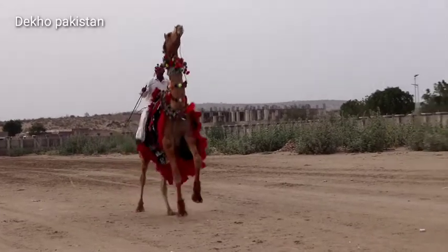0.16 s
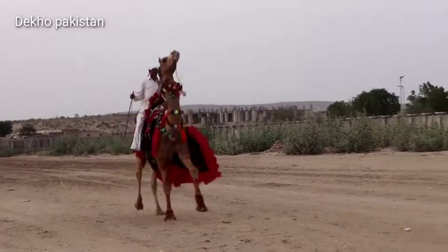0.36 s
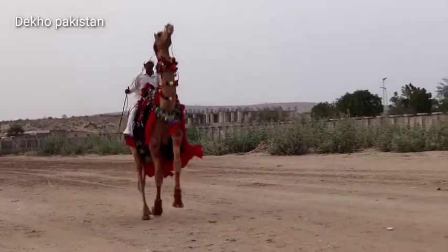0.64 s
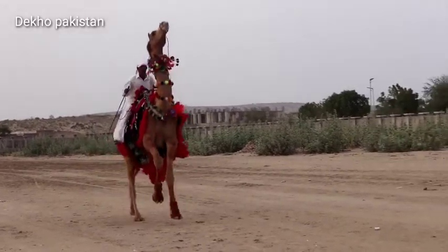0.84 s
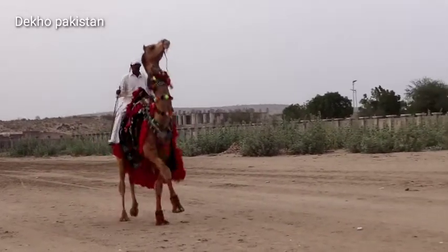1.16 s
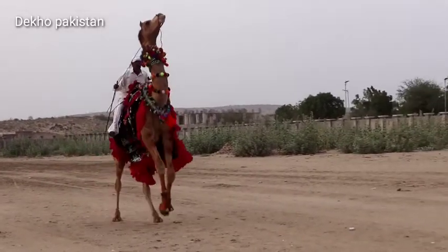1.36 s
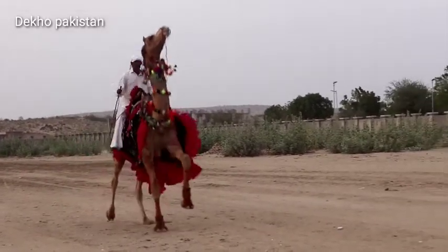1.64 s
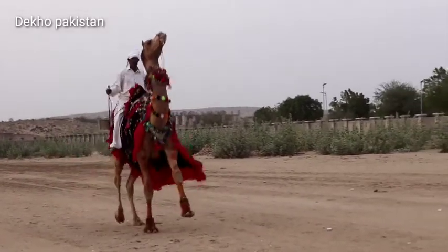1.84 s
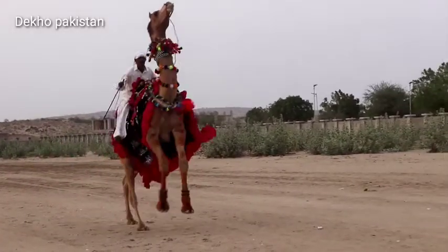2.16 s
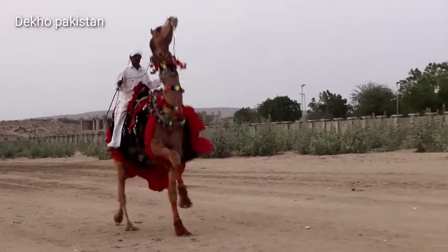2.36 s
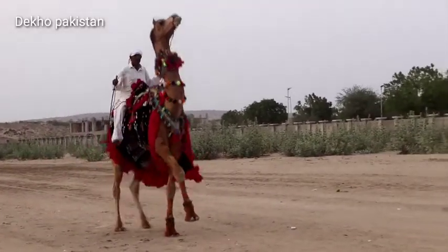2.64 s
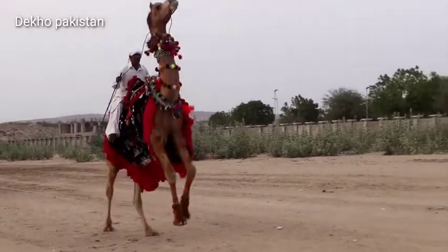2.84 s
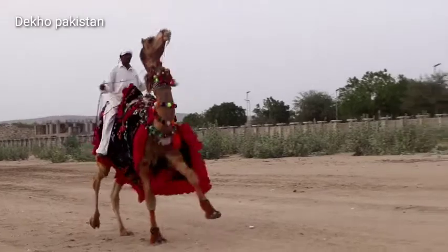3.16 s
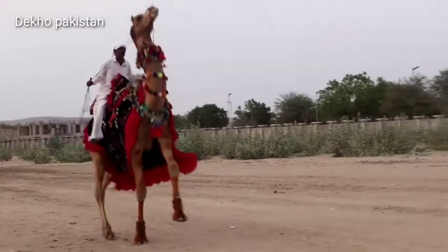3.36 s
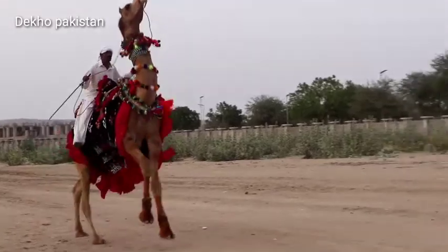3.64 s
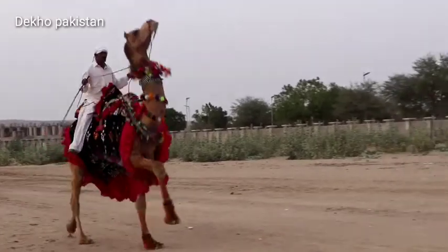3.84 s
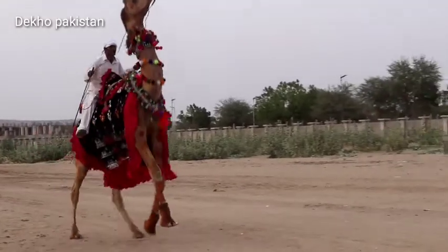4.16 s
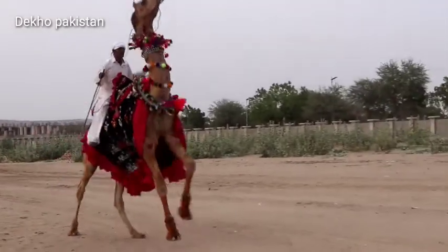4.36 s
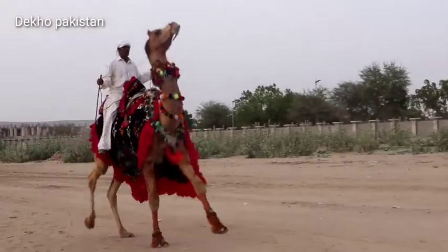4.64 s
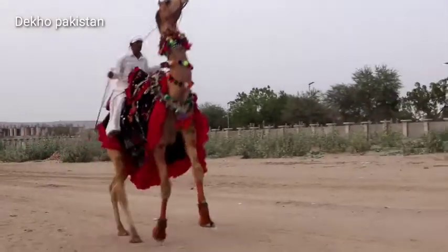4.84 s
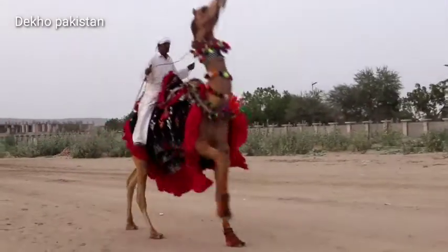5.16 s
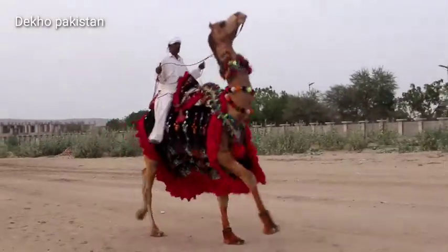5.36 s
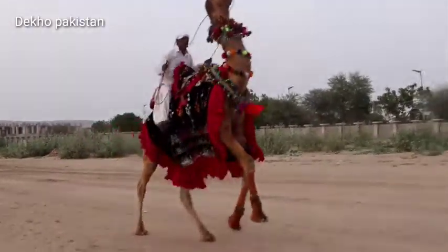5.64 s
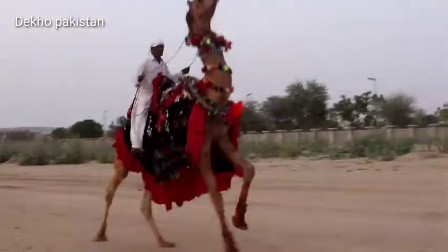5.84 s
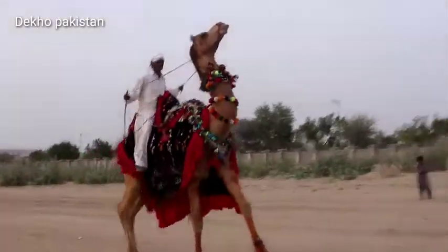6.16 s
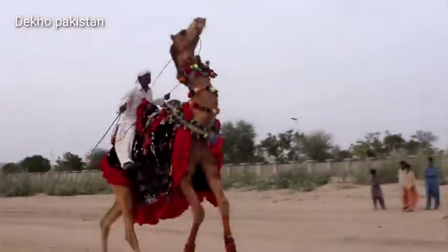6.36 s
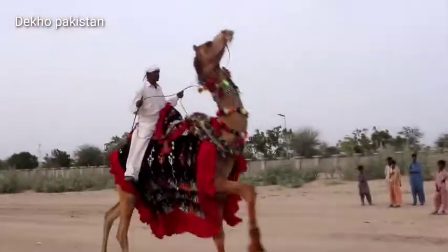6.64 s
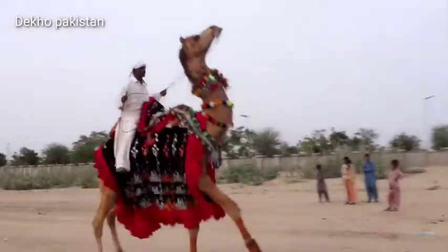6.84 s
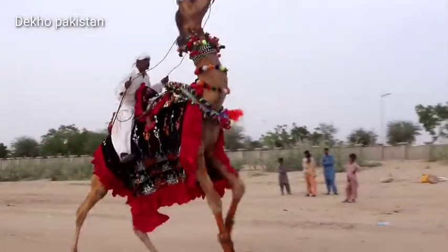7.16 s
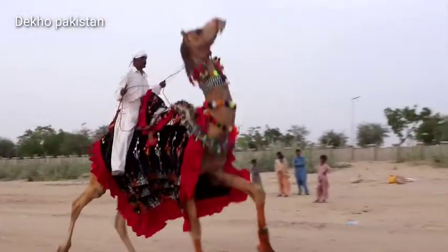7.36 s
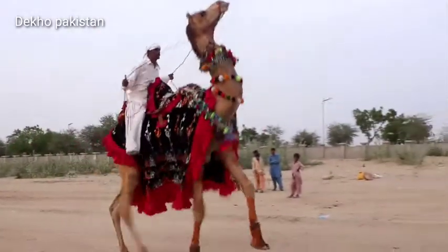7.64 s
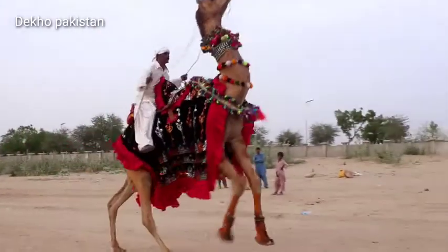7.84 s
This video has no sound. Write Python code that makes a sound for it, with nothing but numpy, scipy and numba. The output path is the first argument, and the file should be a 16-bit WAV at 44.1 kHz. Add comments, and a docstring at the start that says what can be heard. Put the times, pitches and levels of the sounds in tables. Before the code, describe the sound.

An open, dry sandy place with faint air hiss and wind blowing on a stereo microphone. A strong low gust thumps at 0.2 s, and more uneven buffets come around 1.5, 2.1 to 2.7, 4.3, 5.3 to 5.6 and 7.8 s. A prancing camel's harness rattles throughout, somewhat to the right: mid-pitched pellet bells, high shimmering jingles and short clacking plates. About every 0.7 s, from 0.3 s on, a bright toss is followed some 0.17 s later by a denser crash, with loose swings and sharp clinks between. Dull knocks appear from 1.5 s, the strongest at 4.65 s. Larger bells ring on softly now and then, clearer at 6.3 and 7.75 s. As the animal approaches, the jingling swells, with tosses loudest from 5.9 s, peaking at 7.3 s and still rattling at the 8 s end.

```python
"""Open sand, where a camel prances in a rattling harness, heard through two microphone ports.
A dull air hiss is filtered noise; the wind is random thumps shaped into a breeze and gusts.
Plates, pellet bells and small jingles are many short dying tones, struck at random all the time
and harder at each jolt of the gait. Larger bells ring on now and then, and dull knocks are short mixed tones."""
import sys
import numpy as np
from scipy import signal
from scipy.fft import rfft, irfft
from scipy.io import wavfile
from scipy.ndimage import uniform_filter1d
from numba import njit

SR = 44100
rng = np.random.default_rng(int(sys.argv[2]) if len(sys.argv) > 2 else 0)


def waveform_to_disk(signal):
    """Save audio, clipped to [-1, 1], as 16-bit WAV at the path in sys.argv[1]."""
    frames = np.transpose(np.atleast_2d(signal))
    scaled = np.clip(frames, -1, 1) * 32767
    samples = np.round(scaled).astype(np.int16)
    wavfile.write(sys.argv[1], SR, samples)


N = 352800  # 8 s


def gain_of(db):
    """Turns decibels into a factor."""
    return 10 ** (np.asarray(db) / 20)


def evened(x):
    """Scales a sound to an rms of 1."""
    return x / np.sqrt(np.mean(x ** 2) + 1e-20)


def read(points, hz):
    """Reads a table by pitch at any frequency, on a logarithmic pitch scale."""
    table_hz, value = np.transpose(points)
    return np.interp(np.log(hz + 1), np.log(table_hz + 1), value)


def swell(t, s, db, rise_ms, fall_ms):
    """Power that grows and dies as a lopsided bell curve."""
    width_s = np.where(t < s, max(rise_ms, 1), max(fall_ms, 1)) / 1000
    return gain_of(2 * db) * np.exp(-((t - s) / width_s) ** 2)


def air():
    """Quiet field air: a dull hiss of filtered noise, partly shared by the two ports."""
    level_db = -47
    a, b = rng.standard_normal((2, N))
    hiss = signal.lfilter([1], [1, -.8], [a, 0.56 * a + 1.13 * b])
    return gain_of(level_db) * evened(hiss)


# breeze under the gusts: (time [s], rumble level [dB])
BREEZE = [(0.0, -29), (0.5, -57), (1.3, -40), (1.8, -39.5), (2.9, -40.5), (3.15, -59), (4.15, -53),
          (4.42, -36.5), (4.7, -49.5), (5.25, -36.5), (5.41, -70), (5.8, -46.5), (7.25, -41.5), (7.58, -53),
          (8.0, -43.5)]
# gusts: (peak time [s], rumble level [dB], rise [ms], crackle over rumble [dB])
GUSTS = [(0.16, -23.5, 52, -9.5), (0.439, -30.5, 63, -7.5), (0.75, -33.5, 200, -11.5),
         (1.481, -26, 29, -16), (1.63, -29.5, 24, -22), (2.07, -27, 88, -7.5), (2.3, -29.5, 75, -10),
         (2.5, -26, 46, -4.5), (2.659, -25, 27.6, -3.5), (2.822, -33, 31, 3.5), (3.02, -35.5, 42, -11.5),
         (3.33, -32, 15, -5), (3.41, -29, 32.4, -5), (3.6, -44, 24, -18), (3.68, -36, 30, -22),
         (4.0, -42, 19, -15), (4.272, -24.5, 38, -17.5), (4.86, -40.5, 99, -14), (5.299, -29, 27, -12),
         (5.55, -28.5, 53, -21), (5.69, -34, 21, -17), (6.25, -40.5, 150, -15), (6.95, -34.5, 72, -15),
         (7.82, -25, 56, -13.5)]
# colour of the wind at the port: (pitch [Hz], relative strength [dB per Hz])
BUFFET = [(12, -69), (20, -42), (82, -4), (204, 5.5), (327, 2.5), (489, -2), (592, -7), (770, -15.5),
          (1300, -29.5), (1690, -61), (2860, -120)]
# how the ports differ in wind: (pitch [Hz], left over right [dB], left leads [rad])
WIND_PORTS = [(60, 4, 0.05), (110, -3, 0.37), (200, 0.5, 0.94), (380, 5.5, 1.1), (735, 12.5, 1.22)]


def wind():
    """Eddies hit the ports as uneven thumps; the right one gets them later, and weaker in the upper part."""
    breeze_crackle_db, gust_tail = -15, 1.115  # crackle over rumble; fall time over rise time
    t, hz = np.arange(N) / SR, np.fft.rfftfreq(N, 1 / SR)
    slow = t[::64]
    rumble_power = gain_of(2 * np.interp(slow, *np.transpose(BREEZE)))
    crackle_power = rumble_power * gain_of(2 * breeze_crackle_db)
    for s, db, ms, over_db in GUSTS:
        gust = swell(slow, s, db, ms, gust_tail * ms)
        rumble_power = rumble_power + gust
        crackle_power = crackle_power + gust * gain_of(2 * over_db)

    # quick lumps only: the gusts set the slow level
    lumps = evened(uniform_filter1d(uniform_filter1d(rng.standard_normal(N), 350), 350))
    lumps = evened(lumps - uniform_filter1d(lumps, 3500))
    force_db = 1.16 * np.minimum(rng.exponential(1, N), 3) + 4.84 * np.clip(lumps, -3, 1.6)
    hits = rng.random(N) < 600 / SR  # about 600 eddies a second
    eddies = gain_of(force_db) * hits * rng.choice([-1, 1], N)

    # rumble lies below about 400 Hz, crackle above
    colour = rfft(eddies) * gain_of(read(BUFFET, hz))
    upper = 1 / (1 + (400 / (hz + 1)) ** 6)
    rumble = evened(irfft(colour * (1 - upper), N)) * np.interp(t, slow, np.sqrt(rumble_power))
    crackle = evened(irfft(colour * upper, N)) * np.interp(t, slow, np.sqrt(crackle_power))

    port_hz, side_db, lead = np.transpose(WIND_PORTS)
    balance = gain_of(read(np.c_[port_hz, side_db], hz) / 2)
    tilt = balance * np.exp(.5j * read(np.c_[port_hz, lead], hz))
    return irfft(rfft(rumble + crackle) * np.array([tilt, 1 / tilt]), N)


# each stride tosses the harness up, rolls it, and lands it with a crash; it swings loosely in between.
# all four: (time [s], bells level [dB], length [ms], jingles over bells [dB])
TOSSES = [(0.302, -27.5, 22, 8), (0.99, -23, 38, 2.5), (1.673, -17.5, 18, 3), (2.399, -19, 43, 3.5),
          (3.086, -17, 15, 1), (3.789, -22, 20, 8.5), (4.497, -22.5, 22, 3), (5.213, -16, 22, 0),
          (5.939, -12.5, 43, -3), (6.634, -12.5, 18, -3.5), (7.338, -7.5, 22, -5.5)]
ROLLS = [(0.39, -27.5, 54.6, 2), (1.082, -26.5, 45, 5), (1.76, -26.5, 55, 3.5), (2.48, -34.5, 60, 9.5),
         (3.153, -23, 52.3, 1.5), (3.875, -30.5, 70, 6), (4.587, -29, 45, 5), (5.31, -28.5, 60.5, 4),
         (6.02, -26, 60, 1.5), (6.722, -29, 65, 5.5), (7.415, -18, 35.2, 1)]
CRASHES = [(0.478, -19.5, 40, -8), (1.162, -20, 34, -3.5), (1.845, -22, 44, -2), (2.562, -20, 43, -2),
           (3.253, -20, 34, -1.5), (3.954, -17.5, 26, -2), (4.67, -19.5, 24, -5), (5.381, -14, 22, -0.5),
           (6.099, -16.5, 25.4, 0.5), (6.798, -13.5, 18.7, 4.5), (7.497, -13.5, 31, 0)]
SWINGS = [(0.112, -23, 18, -22), (0.191, -29, 28, -7), (0.54, -34, 35, 6), (0.731, -30, 57, -3.5),
          (0.93, -23.5, 45, -6), (0.959, -29, 20, 4), (1.261, -28, 26, -3), (1.439, -31, 29, -17),
          (1.8, -24, 33, -7), (2.036, -25.5, 29, -8), (2.097, -25, 43, -4.5), (2.201, -30, 20, -24),
          (2.287, -27.5, 44, -9), (2.659, -28, 43, -14), (2.816, -24, 22, -10), (2.865, -25.5, 120, -7.5),
          (2.941, -20, 31, -11), (2.98, -27, 15, -22), (3.35, -30, 65, -5), (3.445, -24.5, 65, -4),
          (3.546, -34, 60, -20), (3.729, -21, 8, -2.5), (4.221, -25.5, 51, -24), (4.272, -23, 17, -21),
          (4.627, -17, 6.5, -12), (4.716, -28, 11, -12), (4.776, -31, 24, 0), (4.878, -25.5, 27, -15),
          (4.914, -27.5, 75, -14), (5.145, -16.5, 50, -5.5), (5.166, -22, 21, 0), (5.338, -20, 30, -1),
          (5.566, -25.5, 18, -6), (5.607, -28, 28, -19), (5.687, -26.5, 39, -1), (5.872, -28.5, 47, -8),
          (6.232, -24.5, 25, -1.5), (6.277, -24, 13, -4), (6.306, -20, 12, -18), (6.365, -27, 190, 0.5),
          (6.434, -24.5, 43, -18), (6.529, -17.5, 10, -6), (6.571, -22, 66, -2.5), (6.914, -25, 15, -3),
          (6.984, -22, 38, -1), (7.053, -40, 38, 7), (7.112, -26.5, 57, -1), (7.435, -15.5, 19, -7),
          (7.466, -22, 16, -6), (7.661, -45, 11, -8), (7.693, -14.5, 8.1, -8), (7.783, -21, 80, -2.5),
          (7.941, -23.5, 34, -4), (7.986, -19, 21, -13)]


def jolts():
    """Every jolt as (time s, bells dB, rise ms, fall ms, plates over bells dB, jingles over bells dB)."""
    # share of the length that rises, plates over bells in dB
    kinds = (TOSSES, 0.38, -22), (ROLLS, 0.28, -3.5), (CRASHES, 0.48, 1), (SWINGS, 0.43, -27)
    return [(s, db, rise * ms, (1 - rise) * ms, plates_db, jingles_db)
            for rows, rise, plates_db in kinds
            for s, db, ms, jingles_db in rows]


# steady rattle through one stride, from crash to crash:
# (share of the stride, plates level [dB], bells level [dB], jingles level [dB])
GAIT = [(0.03, -49, -33.5, -27.5), (0.08, -36, -33, -30.5), (0.2, -43.5, -34.5, -32.5),
        (0.32, -40, -32.5, -34.5), (0.55, -37.5, -34, -33), (0.7, -39.5, -30, -31.5), (0.81, -37, -30, -25),
        (0.9, -33, -26, -29.5)]
# change added to the steady rattle as the animal comes near: (time [s], plates [dB], bells [dB], jingles [dB])
NEAR = [(0.0, 0, 0, -4), (1.4, -4.5, 1, -3.5), (2.8, .3, 1.5, .3), (4.2, 1.4, 3.7, -.3),
        (5.6, 2.4, 2.5, 0.5), (6.8, 4, 0.9, 0.5), (8.0, 5, 6.5, 5.5)]


def shaking(t, kind):
    """How hard plates (0), bells (1) or jingles (2) are struck: the rattle of the gait plus every jolt."""
    crash_s = np.transpose(CRASHES)[0]
    stride_s = np.diff(crash_s).mean()
    marks = np.r_[crash_s[0] - stride_s, crash_s, crash_s[-1] + stride_s]
    share = np.interp(t, marks, np.arange(len(marks))) % 1
    gait, near = np.transpose(GAIT), np.transpose(NEAR)
    rattle_db = np.interp(share, gait[0], gait[1 + kind], period=1)
    near_db = np.interp(t, near[0], near[1 + kind])
    power = gain_of(2 * (rattle_db + near_db))
    for s, db, rise_ms, fall_ms, plates_db, jingles_db in jolts():
        over_db = (plates_db, 0, jingles_db)[kind]
        power = power + swell(t + 0.0039, s, db + over_db, rise_ms, fall_ms)  # blows come 3.9 ms early
    return np.sqrt(power)


@njit
def ring(length, at, hz, fade, phase, size, soft):
    """Adds up dying sines, one per blow on a mode, with a size and phase for each ear and a soft start."""
    out = np.zeros((2, length))
    for k in range(len(at)):
        step, gap = np.exp(-fade[k] + 1j * hz[k]), 1.
        left = size[0, k] * np.exp(1j * phase[0, k])
        right = size[1, k] * np.exp(1j * phase[1, k])
        for n in range(at[k], min(length, at[k] + int(4 / fade[k]))):
            out[0, n] += left.imag * (1 - gap)
            out[1, n] += right.imag * (1 - gap)
            left *= step
            right *= step
            gap *= soft
    return out


# modes (the tones a piece rings at) of the larger bells: [Hz], and strength over the small pieces [dB]
LARGE_HZ = [1715, 1860, 2283, 2560, 2690, 2790, 2975, 3040, 3390, 3675, 3970, 4340, 5290, 5560, 6207, 6450,
            6750, 7075, 7280, 7720, 8980, 9900]
LARGE_DB = [13.5, 7.8, 14.5, 1.5, 10.5, 1, -16.5, 3, -26, -9, 11.5, 14.5, -10.5, -1, 0.5, 7, 4, 0.5, 12,
            -8.5, 4, -12]
# sharp clinks, a bunch of pieces struck at once: (time [s], level before each kind's own shift [dB])
CLINKS = [(0.299, -11), (0.3674, -13), (0.986, -11), (1.1478, -13), (1.4181, -16), (1.5449, -19),
          (1.6657, -11), (2.1999, -15), (2.3974, -12), (3.0807, -9), (3.4443, -15), (3.7214, -14),
          (3.773, -11), (4.495, -12), (4.7147, -17), (4.9106, -9), (5.2093, -10), (5.3374, -9), (5.382, -9),
          (6.0883, -9), (6.3039, -10), (6.569, -10), (6.631, -9), (6.787, -9), (6.9097, -16), (7.3319, -10),
          (7.657, -16), (7.6858, -11)]
# balance as the animal crosses: (time [s], left over right [dB])
SIDE_DB = [(0.0, -10), (4.45, -10.5), (5.44, -6.5), (8.0, -8)]
# balance of the metal by pitch, added to that: (pitch [Hz], left over right [dB])
PORTS = [(900, 3), (1300, 10), (2400, 0), (4400, 7.5), (8100, 4), (15000, 6.5)]


def metal(level, modes, lo_hz, hi_hz, t60, spread_db, apart, large_share, clink_db, choke, count, blows, order):
    """Hanging pieces with a few modes each; random blows and clinks set these ringing as dying sines."""
    # the pieces: modes spread evenly over the range, each piece hanging at its own spot
    slot = rng.permutation(count * order).reshape(count, order) + rng.random((count, order))
    hz = lo_hz + slot / slot.size * (hi_hz - lo_hz)
    ring_s = t60 * gain_of(4.7 * rng.standard_normal((count, order)))  # time to die by 60 dB
    place = rng.standard_normal((count, order, 2))

    # the blows: steady random ones first, then 8 within 1.5 ms for each clink
    clink_s, hard_db = np.repeat(CLINKS, 8, axis=0).T
    when, pick, force, large, which, tune, turn = rng.random((blows + len(clink_s), 7)).T
    steady_s = (np.arange(blows) + when[:blows]) / blows * N / SR
    when = np.r_[steady_s, clink_s + .0015 * when[blows:]]
    piece = (pick * count).astype(int)
    hz, ring_s, place = hz[piece], ring_s[piece], place[piece]
    boost_db = np.zeros((len(when), order))

    # some blows land on a larger bell
    which = (which * len(LARGE_HZ)).astype(int)
    large_hz = np.take(LARGE_HZ, which)
    lands = (large < large_share) & (large_hz > lo_hz) & (large_hz < hi_hz)
    hz[lands, 0] = large_hz[lands]
    boost_db[lands, 0] = np.take(LARGE_DB, which)[lands]
    ring_s[lands, 0] = .16

    hz = hz * (1 + .007 * (tune[:, None] - .5))  # each blow is a little out of tune
    ring_s[blows:] *= .15  # pieces that meet in a clink damp each other
    landing = abs(when[:, None] - np.transpose(CRASHES)[0]).min(axis=1) < .035
    ring_s[landing] = np.minimum(ring_s[landing], .06)  # a crash slams every piece against the hide
    fade = np.log(1000) / (np.clip(ring_s, .004, .5) * SR)

    # strength of each blow, with the steady ones evened out to rms 1 before the level is applied
    height = gain_of(read(modes, hz) + boost_db) * np.sqrt(fade)
    height = height / np.sqrt(np.sum(height[:blows] ** 2 / fade[:blows] / 4) / N)
    touch = gain_of(spread_db * np.minimum(-np.log(1 - force[:blows]), 2.5))  # many light, a few hard
    steady = evened(touch) * level(when[:blows])
    height = height * np.r_[steady, gain_of(hard_db + clink_db)][:, None]
    height = height / level(when)[:, None] ** choke  # makes up for the choking at the end

    s, side_db = np.transpose(SIDE_DB)
    side_db = np.interp(when, s, side_db)[:, None] + read(PORTS, hz) + 2.0 * place[..., 0]
    ears = np.array([height * gain_of(side_db / 2), height * gain_of(-side_db / 2)]).reshape(2, -1)
    start = 2 * np.pi * turn[:, None] + 0 * hz
    phase = np.array([start + apart * place[..., 1], start]).reshape(2, -1)
    at = np.repeat((when * SR).astype(np.int64), order)
    soft = np.exp(-1 / (0.00041 * SR))  # onset takes about 0.4 ms
    rung = ring(N, at, (2 * np.pi * hz / SR).ravel(), fade.ravel(), phase, ears, soft)

    # pieces falling back on the hide are choked: the ringing drops as the shaking drops
    t = np.arange(0, N, 32) / SR
    return rung * np.interp(np.arange(N) / SR, t, level(t)) ** choke


# strength of the modes of plates, pellet bells and small jingles: (pitch [Hz], relative strength [dB per Hz])
PLATES = [(800, -14), (1200, -1), (1800, 3.5), (3500, 2), (6500, -5)]
BELLS = [(1240, -40), (2100, -13.5), (2420, -7.5), (2580, 3), (2750, 6.5), (3040, 6), (3240, -4),
         (3960, -1), (4220, -9.5), (4730, -9.5), (4900, -33), (6370, -43), (10800, -120)]
JINGLES = [(2820, -34), (4800, -3.5), (5570, -2.5), (7480, 1.5), (8100, -1), (9340, -2), (13200, -12.5),
           (14900, -17), (15600, -35)]


def harness():
    """Plates clack broad and short, pellet bells ring in the middle, small jingles shimmer on top."""
    # t60 in s before its spread, apart in rad between the ears, order = modes per piece
    plates = metal(lambda t: shaking(t, kind=0), PLATES,
                   lo_hz=892, hi_hz=6635, t60=0.046, spread_db=2.0, apart=0.39, large_share=0.25,
                   clink_db=-23.5, choke=0.21, count=60, blows=3000, order=8)
    bells = metal(lambda t: shaking(t, kind=1), BELLS,
                  lo_hz=2100.3, hi_hz=4888, t60=0.091, spread_db=4.5, apart=0.7, large_share=.3,
                  clink_db=-13.5, choke=0.23, count=60, blows=3200, order=4)
    jingles = metal(lambda t: shaking(t, kind=2), JINGLES,
                    lo_hz=4788, hi_hz=15650, t60=0.084, spread_db=6.0, apart=1.0, large_share=0.25,
                    clink_db=-20, choke=0.47, count=160, blows=7000, order=6)
    return plates + bells + jingles


# a larger bell struck while hanging free: (time [s], level of its main tone [dB], pitch [Hz])
PEALS = [(0.329, -37, 3970), (.72, -33, 2310), (.9, -34, 3970), (2.051, -41, 3970), (2.419, -36, 4020),
         (2.8, -38, 2330), (4.2, -37, 5260), (6.3, -36.5, 2274), (6.3, -27.5, 3720), (6.31, -30, 3350),
         (7.75, -23.5, 2680)]


def peals():
    """Each peal is one slowly dying mode whose split halves beat gently."""
    out, t = np.zeros((2, N)), np.arange(SR // 2) / SR
    edges = signal.windows.tukey(len(t), .1)  # eases in and out over 25 ms
    sides = gain_of([[-2.5], [2.5]])  # right is 5 dB louder
    for (s, db, hz), turn in zip(PEALS, rng.random(len(PEALS))):
        tone = np.sin(2 * np.pi * hz * t)
        tone = tone + .4 * np.sin(2 * np.pi * (0.996 * hz * t + turn))
        tone = gain_of(db - 60 * t / 0.94) * tone * edges  # dies at 60 dB in 0.94 s
        part = out[:, round(s * SR):][:, :len(t)]
        part += (sides * tone)[:, :part.shape[1]]
    return out


# short dull knocks of wood, leather or a plate:
# (time [s], starting level of the main tone [dB], pitch [Hz], left over right [dB])
KNOCKS = [(1.545, -31, 2120, -21), (1.643, -25.5, 1270, -3), (2.939, -23.5, 1390, 1),
          (3.148, -19.5, 1730, 0), (4.483, -30.5, 557, -5), (4.563, -25, 1710, -3),
          (4.654, -10.5, 2170, -9), (4.913, -20, 1820, -21), (4.939, -22, 890, -10),
          (5.185, -25.5, 1310, -2), (5.367, -37, 1110, -2), (5.869, -26.5, 816, -12),
          (5.915, -25.5, 577, -3), (6.09, -24, 1260, -4), (6.315, -22.5, 820, -9), (6.604, -26, 824, -4),
          (7.325, -21.5, 560, 1)]


def knocks():
    """Each knock is a short dying tone at its pitch with weaker modes on either side."""
    out, t = np.zeros((2, N)), np.arange(1300) / SR
    for s, db, hz, side_db in KNOCKS:
        tone = np.sin(2 * np.pi * hz * t)
        tone = tone + 0.57 * np.sin(2 * np.pi * 1.255 * hz * t)
        tone = tone + .5 * np.sin(2 * np.pi * .8 * hz * t)
        # dies by 60 dB in 30 ms, after a soft start of about 0.4 ms
        tone = gain_of(db - 60 * t / 0.03) * tone * (1 - np.exp(-t / 0.00038))
        out[:, round(s * SR):][:, :len(t)] += gain_of([[side_db / 2], [-side_db / 2]]) * tone
    return out


def scene():
    """Air, wind, harness, peals and knocks together."""
    return air() + wind() + harness() + peals() + knocks()


def record(dry):
    """Gain control ducks everything a moment after it gets loud; then bass cut, soft peaks and band limit."""
    threshold_db, recovery_db_per_s, edge_hz = -19, 60., 15620
    power_db = 10 * np.log10(abs(uniform_filter1d((dry ** 2).mean(0), 600)) + 1e-12)
    fall_db = np.arange(N) * recovery_db_per_s / SR
    held_db = np.maximum.accumulate(power_db + fall_db) - fall_db
    over_db = np.maximum(held_db - threshold_db, 0)
    late_db = signal.lfilter([1 / 700], [1, 1 / 700 - 1], over_db)  # reacts over about 700 samples
    ducked = dry / gain_of(0.85 * late_db)
    ducked = signal.lfilter(*signal.butter(2, 45, "high", fs=SR), ducked)
    rounded = .95 * np.tanh(ducked / .95)  # the loudest peaks are rounded off
    band = signal.firwin(1023, edge_hz, window=("kaiser", 9), fs=SR)
    return signal.oaconvolve(rounded, band[None], "same")


dry = scene()
out = record(dry)
waveform_to_disk(out)
```